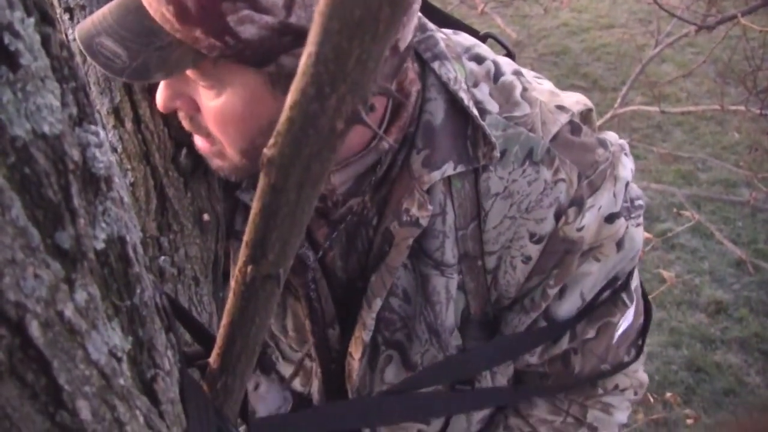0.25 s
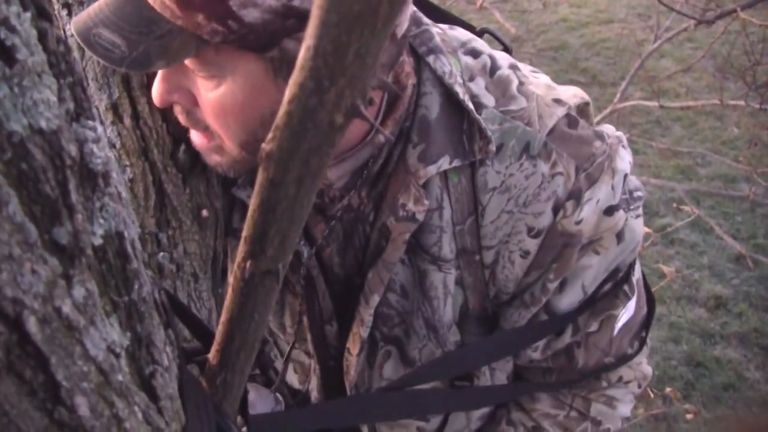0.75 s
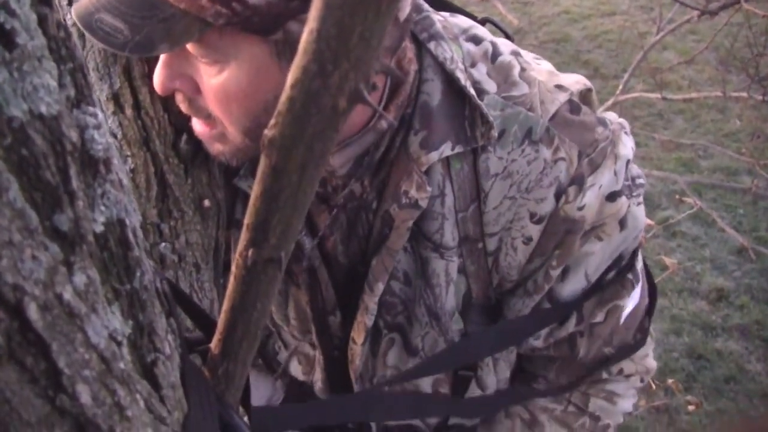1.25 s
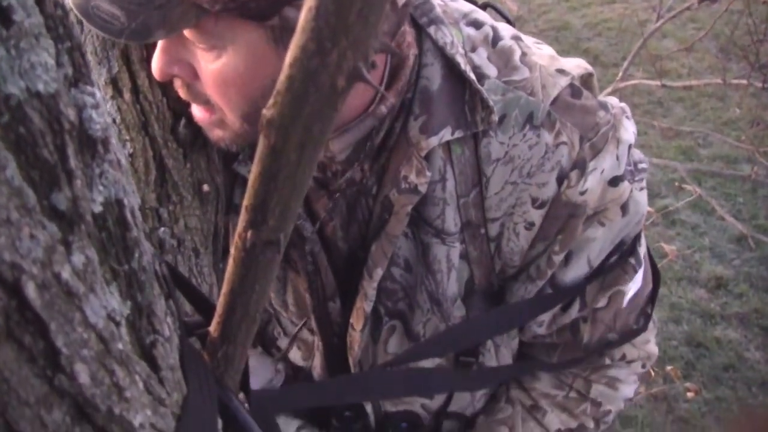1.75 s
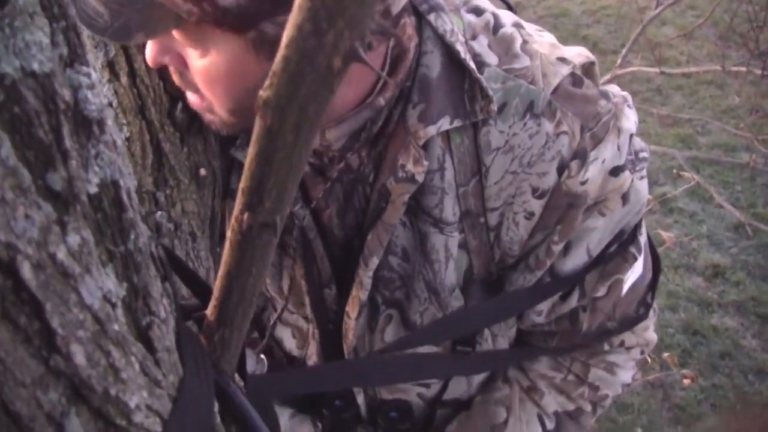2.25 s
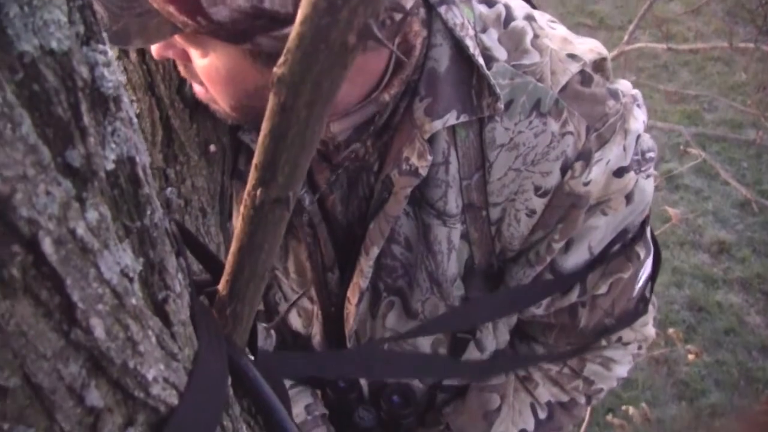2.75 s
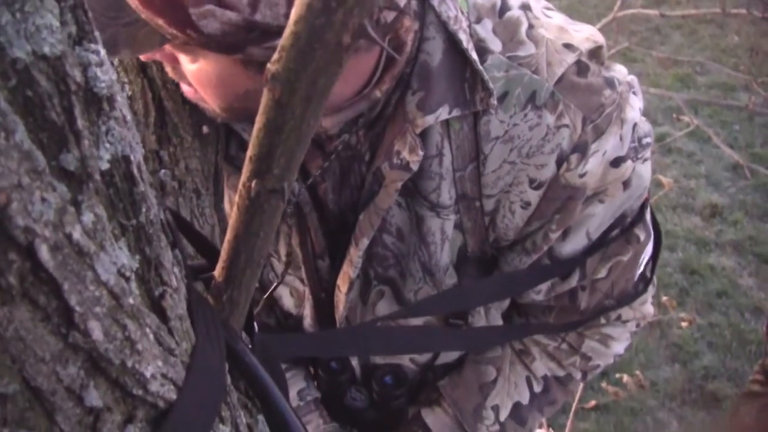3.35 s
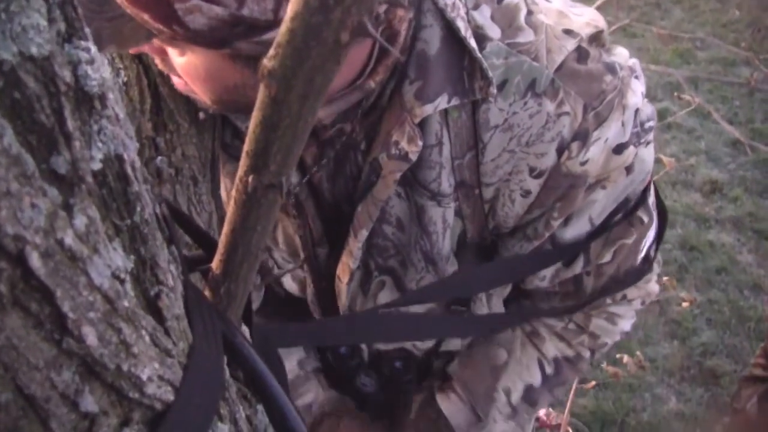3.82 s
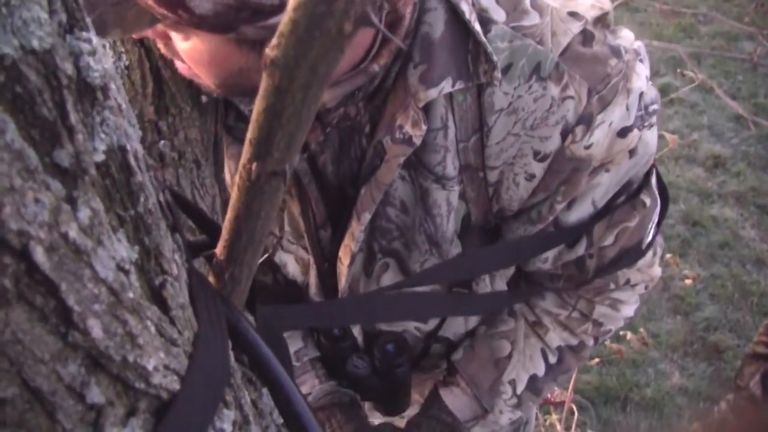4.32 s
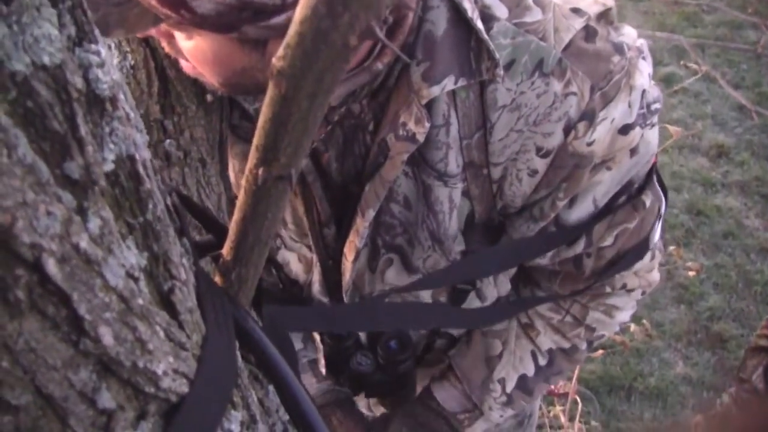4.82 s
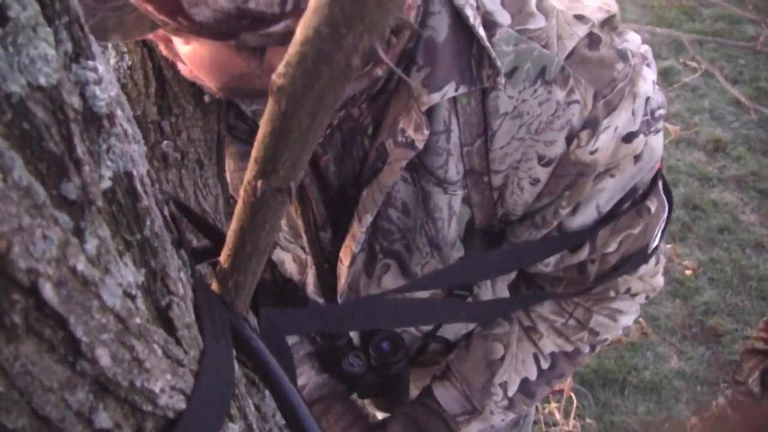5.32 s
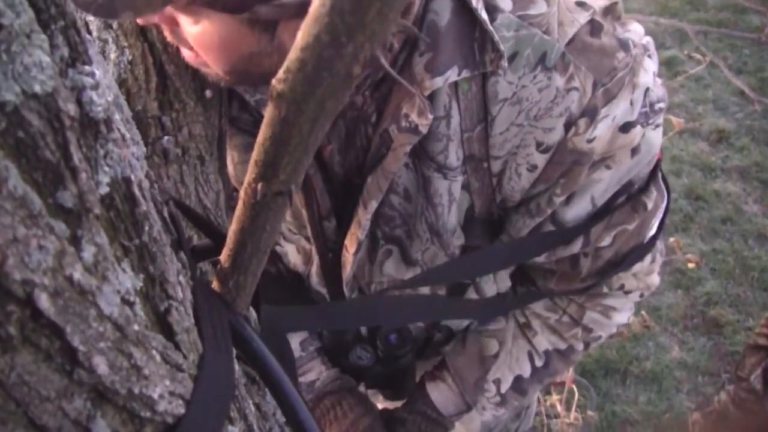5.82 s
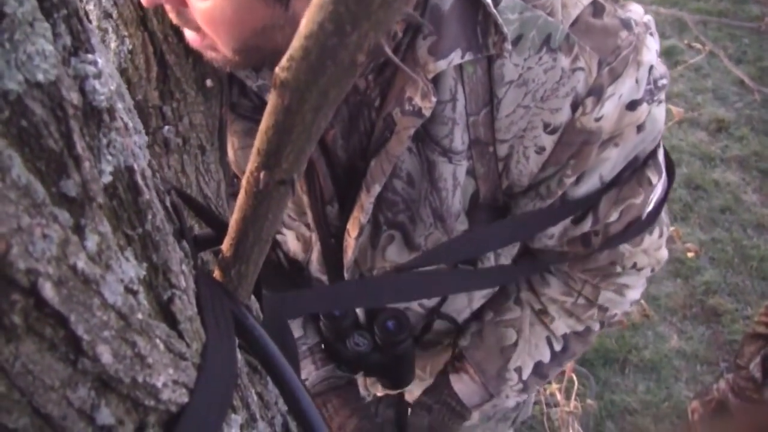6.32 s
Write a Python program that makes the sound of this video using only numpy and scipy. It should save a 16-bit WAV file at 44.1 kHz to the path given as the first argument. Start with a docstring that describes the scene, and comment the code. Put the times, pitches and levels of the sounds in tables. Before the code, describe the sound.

Close, dry rattling of two deer antlers, knocking and grinding together in quick uneven bursts, with a faint low outdoor hush in the gaps.

```python
"""In a quiet wood, a hunter in a tree stand rattles a pair of deer antlers close to the microphone.
Tines (the antler points) knock together and grind over knobbly bone: small contacts set off short
rings, mixed with crunchy noise. The hands damp most of the ringing within a few hundredths of a second.
Loose tine tips ring on faintly, trees return a soft echo, and filtered noise makes a low, distant hush
with a faint drone in it; the level of the hush dips and recovers."""
import sys
import numpy as np
from scipy import signal
from scipy.io import wavfile
from scipy.ndimage import uniform_filter1d, minimum_filter1d, map_coordinates

SR = 44100
rng = np.random.default_rng(int(sys.argv[2]) if len(sys.argv) > 2 else 0)


def transcribe(u):
    """Save the signal u as a 16-bit wav file named by the first command-line argument.

    u: samples, shape (n,) or (channels, n), limited to [-1, 1]; the rate is SR.
    q: integer samples, one column per channel.
    """
    v = np.clip(np.atleast_2d(u).T, -1, 1)
    q = np.round(v * 32767).astype(np.int16)
    wavfile.write(sys.argv[1], SR, q)


N = 289737

# The sound is built in four registers, low to high: hollow beam (main stem), main ring, tines, hard crack.

# Knocks of antler on antler, levels before the balance of the registers:
# t/s, level/dB, beam against that level/dB, crack against that level/dB, pitch of the struck spot f/Hz
KNOCK_LIST = [(0.2719, -19, -21, -15, 2560), (0.2868, -15.5, -8, -13, 2880),
              (0.3069, -14.5, -11, -12, 1950), (0.341, -30, -4, -22, 1860),
              (0.3565, -25.5, -8.5, -37, 2020), (0.7905, -58, 4, -5, 1150), (1.0227, -24.5, -7, -27, 1930),
              (1.0455, -16, -12.5, -17.5, 1930), (1.0783, -13, -17, -17.5, 2000),
              (1.092, -21, -25.5, -14, 1820), (1.1155, -22.5, -15, -22.5, 1940),
              (1.147, -14, -11.5, -4.5, 1910), (1.1634, -20, -7.5, -28.5, 3110),
              (1.1866, -6, -29, -14, 2200), (1.2622, -16, -24, -18, 2090),
              (1.2819, -15, -20.5, -14.5, 4040), (1.299, -10, -25.5, -11, 4330),
              (1.3353, -18, -14, -5.5, 1995), (1.394, -32, -1.5, -19.5, 1100),
              (1.434, -40.5, 6, -27.5, 920), (1.465, -16.5, -7, -9, 1870),
              (1.4916, -19.5, -16, -14.5, 1840), (1.5476, -1, -23.5, -16, 1960),
              (1.5547, -14.5, -11, -11, 3040), (1.5832, -23.5, -1.5, -23.5, 930),
              (1.599, -14, -8, -14, 1940), (1.7559, -39.5, -3, -41, 1020), (1.7793, -19, -10.5, -37, 3080),
              (1.8057, -25, -15.5, -29, 3280), (1.851, -23.5, -17, -14, 3720),
              (1.865, -14.5, -10.5, -16, 3360), (1.8813, -11.5, -13.5, -20, 2840),
              (1.955, -27, -19, -21, 4460), (1.9899, -14, -26.5, -12.5, 2039),
              (2.0344, -19.5, -20.5, -5.5, 4430), (2.0411, -16.5, -19, -7, 1890),
              (2.0466, -14, -7.5, -29, 1816), (2.0632, -32, -3, -19, 2970), (2.1183, -13.5, -10, -35, 2000),
              (2.1364, -12.5, -15.5, -14.5, 2130), (2.163, -29, -5.5, -28, 4340),
              (2.3068, -40.5, -8.5, -23, 1960), (2.3494, -12.5, -19, -14.5, 1820),
              (2.38, -13, -24, -4.5, 5480), (2.4168, -10, -25.5, -7, 4410),
              (2.4239, -15.5, -20.5, -6.5, 4160), (2.4525, -30.5, -15, -25, 2040),
              (2.469, -19, -28.5, -14.5, 3120), (2.502, -13, -20, -13, 2700),
              (2.529, -13.5, -15, -1.5, 2833), (2.5587, -17, -11.5, -9.5, 1950),
              (2.5734, -23.5, -14, -25.5, 3970), (2.6137, -24, -20.5, -16.5, 2000),
              (2.6661, -19, -5.5, -28, 1900), (2.7171, -15.5, 1, -36, 1108), (2.7227, -12.5, -4, -34, 1046),
              (2.867, -42.5, 1, -30.5, 1807), (3.2611, -48, -8.5, -39, 2010),
              (3.5768, -16.5, -18, -18.5, 3520), (3.6241, -18, -22, -21, 2020),
              (3.6829, -11.5, -16.5, -26, 2750), (3.6868, -4, -18, -20.5, 2800),
              (3.7282, -17, -26.5, -19.5, 3580), (3.8363, -17, -9.5, -12, 3320),
              (3.8544, -16, -29, -21.5, 3770), (3.8689, -17.5, -21, -13.5, 1820),
              (3.897, -8.5, -22.5, -11.5, 2126), (3.9258, -19.5, -23.5, -7.5, 3240),
              (3.9998, -47, -2, -15.5, 930), (4.1026, -44, -4, -28.5, 2038),
              (4.1293, -30.5, -10.5, -42.5, 1920), (4.1523, -26, -9.5, -16.5, 1950),
              (4.1727, -12.5, -17, -22.5, 2220), (4.1908, -3, -20, -19.5, 2860),
              (4.2121, -20, -12.5, -9, 2170), (4.287, -40, -19.5, -30.5, 1910),
              (4.3194, -36, -15.5, -20.5, 2130), (4.3375, -22, -16.5, -16, 3570),
              (4.4447, -15.5, -20.5, -33, 1850), (4.463, -12.5, -14, -8.5, 2950),
              (4.477, -11, -16, -25.5, 2000), (4.4854, -4.5, -36, -17, 2630),
              (4.7696, -42.5, -6.5, -35, 2060), (4.803, -20.5, -22.5, -26.5, 2060),
              (4.8091, -12.5, -23, -37.5, 2050), (4.8162, -11, -10.5, -22.5, 2700),
              (4.845, -19.5, -3, -23.5, 2130), (4.8592, -12.5, -25.5, -18, 2230),
              (4.8833, -33.5, -7, -15.5, 1670), (4.9001, -30, -9.5, -28.5, 2080),
              (4.9595, -46.5, -5, -34, 1884), (5.378, -21.5, -10.5, -18.5, 1913),
              (5.4, -13.5, -15, -10.5, 1940), (5.4168, -9.5, -27, -22, 2100),
              (5.4451, -20.5, -28.5, -11, 1710), (5.4727, -16, -29, -26.5, 2950),
              (5.4991, -14.5, -23.5, -24, 1867), (5.5647, -30.5, -13.5, -25.5, 2180),
              (5.624, -22.5, -23, -18.5, 3610), (5.6459, -25, -10.5, -13.5, 4290),
              (5.6628, -16, -29.5, -23.5, 2730), (5.673, -5.5, -24.5, -12, 2630),
              (5.6859, -10, -27, -12.5, 2770), (5.715, -18.5, -28, -14, 2103),
              (5.7722, -17.5, -24.5, -25, 1690), (6.4201, -46, -1, -33, 920), (6.512, -43, -23, -41, 2140)]
# Strokes in which the antlers slide on each other, before the overall grinding level:
# start t/s, swell/s, fade/s, peak level/dB, sharpness of the edges/dB
STROKE_LIST = [(0.274, 0.037, 0.013, -15, -14), (0.327, 0.02, 0.026, -27, -26),
               (1.03, 0.051, 0.048, -15.5, -5.5), (1.163, 0.022, 0.011, -12, -11),
               (1.253, 0.032, 0.062, -15, 4), (1.459, .043, 0.044, -15, -2),
               (1.541, 0.021, 0.0069, -16, -27), (1.581, 0.024, 0.0078, -12.5, -3),
               (1.785, .027, .012, -25, -12), (1.854, 0.033, 0.035, -11, -0.5),
               (1.972, 0.02, 0.028, -11, -12), (2.03, 0.011, 0.013, -15, -20),
               (2.062, .02, 0.028, -26.5, -25), (2.117, 0.012, 0.024, -14.5, -17),
               (2.328, 0.037, 0.074, -15, -5.5), (2.373, 0.045, 0.021, -20, -5),
               (2.472, .051, 0.047, -14, 3), (2.666, 0.00765, 0.029, -23, -18.5),
               (2.708, 0.016, .011, -19, -20), (3.629, 0.063, 0.053, -14.5, -6),
               (3.803, 0.1, .036, -14, -14), (4.135, 0.061, 0.028, -14, -9.5),
               (4.432, .054, .03, -12.5, -5), (4.505, 0.024, .012, -29.5, 5), (4.8, .016, .04, -12.5, -15),
               (5.381, 0.029, .026, -14.5, -2), (5.444, 0.015, 0.074, -22.5, -7),
               (5.646, 0.036, 0.044, -13.5, 1)]


def from_db(db):
    """Turn decibels into a multiplier for the wave."""
    return 10 ** (np.asarray(db) / 20)


def rms(x):
    """Root mean square: the average strength of a sound."""
    return np.sqrt(np.mean(x ** 2) + 1e-20)


def add(out, s, sound):
    """Mix a stereo sound in, starting at s seconds."""
    at = max(round(s * SR), 0)
    out[:, at:at + sound.shape[1]] += sound[:, :N - at]


def at_hz(points, hz, axis=1):
    """Read a table's column at a pitch, in straight lines on a log-frequency axis."""
    points = np.array(points)
    return np.interp(np.log(hz), np.log(points[:, 0]), points[:, axis])


def cut(x, hz, kind, order=2):
    """Keep only part of the pitch range, with a Butterworth filter."""
    return signal.sosfilt(signal.butter(order, hz, kind, fs=SR, output="sos"), x)


def drift(rate, size):
    """Wander around zero in straight lines between random points, rate points a second."""
    knots = np.arange(size) * rate / SR
    values = rng.standard_normal(int(knots[-1]) + 2)
    return np.interp(knots, np.arange(len(values)), values)


def noise_bands(size):
    """Split noise into half-octave bands, each with its centre in Hz and two unrelated noises."""
    edges = np.geomspace(25, 17000, 20)
    # neighbouring bands take turns between two sources
    white = rng.standard_normal((2, 2, size))
    bands = []
    for k, (low, high) in enumerate(zip(edges, edges[1:])):
        bands.append((np.sqrt(low * high), cut(white[k % 2], [low, high], "band")))
    return bands


def knocks(register_db, chatter_db, chatter_s, glancing_s, glancing_db, lone_damping,
           crunch_db=-4, crunch_t60=0.024):
    """A lone knock is a short clack with quick rebounds; between sliding antlers it becomes a skid."""
    favour_db = 6.5  # lift of the mode under the struck spot
    # tines ring more, against the main ring, the harder the crack and the higher the struck spot
    tine_db, tine_per_crack, tine_db_per_octave = 1.0, .45, 12.5
    usual_crack_db, usual_spot_hz = -20, 2500
    beam_top_hz = 1950  # every spot below this pitch wakes the tines alike

    out = np.zeros((2, N))
    size, attack = int(.06 * SR), int(.005 * SR)
    for s, db, beam_db, crack_db, spot_hz in KNOCK_LIST:
        sliding = any(start + .005 < s < start + swell + fade
                      for start, swell, fade, _, _ in STROKE_LIST)
        if sliding:
            spread, rebound_db, damping = glancing_s, glancing_db, 1
        else:
            spread, rebound_db, damping = chatter_s, chatter_db, lone_damping

        # one first contact and up to five rebounds
        clicks = np.zeros(size)
        delays = np.minimum(spread * (np.arange(5) + rng.random(5)) / 5, .02)
        clicks[(delays * SR).astype(int)] = from_db(rebound_db) * np.exp(-delays / spread)
        clicks[0] = 1
        registers = bone(clicks, spot_db=1.5, detune=0.038, damping=damping,
                         spot_hz=spot_hz, favour_db=favour_db)

        # main ring and tines share the energy of the blow
        octaves = np.log2(max(spot_hz, beam_top_hz) / usual_spot_hz)
        crack_lift_db = tine_per_crack * (crack_db - usual_crack_db)
        tine = from_db(tine_db + crack_lift_db + tine_db_per_octave * octaves)
        main = 1 / np.hypot(1, tine)
        balance = [from_db(beam_db), main, main * tine, from_db(crack_db)]
        levels = from_db(db + np.array(register_db)) * balance

        pressure = from_db(-60 * np.arange(size) / (crunch_t60 * SR))
        for level, ring, grit in zip(levels, registers, crunch(pressure)):
            # match strengths over the first 5 ms
            even_ring = ring / rms(ring[:, :attack])
            even_grit = grit / rms(grit[:, :attack])
            clack = even_ring + from_db(crunch_db) * even_grit
            add(out, s, level * clack / rms(clack[:, :attack]))
    return out


def grinding(level_db, catches_per_s, uneven_db, sharpness_slopes, crunch_db, crunch_t60):
    """Sliding tines catch on knobs of the beam in a dense, uneven run of contacts that swells and fades."""
    # balance of the beam (at the start), main ring, tines and crack: level/dB
    balance_db = [-10, 0.5, 0.5, -14.5]
    # every stroke starts and ends below its peak, and grows sharper as it runs out toward the tips
    start_db, end_db, sharpens_db = -15, -20, 5
    # soft run-in and run-out of each stroke: length, and faintest level against the peak
    run_s, run_db = .018, -45.5
    grips = 4  # the grip, and the modes with it, shift between these parts of a stroke
    beam_mutes_db_per_s = 1.6  # the grip tightens over the scene and mutes the hollow beam
    favour_db = 5.0  # lift of the mode at the spot of the knock nearest in time

    out, ring_out = np.zeros((2, N)), SR // 25
    for start, swell, fade, peak_db, edge_db in STROKE_LIST:
        length = swell + fade
        span = int((length + 2 * run_s) * SR)
        t = np.arange(span + ring_out) / SR - run_s
        force_db = np.interp(t, [-run_s, 0, swell, length, length + run_s],
                             [run_db, start_db, 0, end_db, run_db])
        force = from_db(peak_db + force_db)

        # catches come at uneven times with uneven strengths
        gaps = rng.gamma(2, .5, 400)
        at = (np.cumsum(gaps) * SR / catches_per_s).astype(int)
        sizes = from_db(uneven_db * np.clip(rng.standard_normal(len(at)), -2, 1.5))
        clicks = np.zeros(len(t))
        clicks[at[at < span]] = sizes[at < span]
        clicks *= force

        registers = np.zeros((4, 2, len(t)))
        shifts = np.linspace(0, span, grips + 1).astype(int)
        for a, b in zip(shifts, shifts[1:]):
            # keep the pitch of the spot last struck or about to be struck
            now = t[(a + b) // 2] + start
            spot_hz = min(KNOCK_LIST, key=lambda knock: abs(knock[0] - now))[-1]
            part = np.pad(clicks[a:b], (0, ring_out))
            registers[:, :, a:b + ring_out] += bone(part, spot_db=5.0, detune=.05, damping=0.56,
                                                    spot_hz=spot_hz, favour_db=favour_db)

        # every catch also crushes a little rough bone
        pressure = signal.lfilter([1], [1, -from_db(-60 / (crunch_t60 * SR))], clicks + 1e-18)
        energy = rms(force[:span]) * np.sqrt(span / len(t))
        # sharp edges bring out the upper registers
        sharpness = edge_db + sharpens_db * np.interp(t, [0, length], [-.5, .5])
        colours_db = np.array(balance_db, float)
        colours_db[0] -= beam_mutes_db_per_s * start
        for colour_db, slope, ring, grit in zip(colours_db, sharpness_slopes, registers, crunch(pressure)):
            scrape = ring / rms(ring) + from_db(crunch_db) * grit / rms(grit)
            gain = from_db(level_db + colour_db + slope * sharpness) * energy
            add(out, start - run_s, gain * scrape / rms(scrape))
    return out


def bone(clicks, spot_db, detune, damping, spot_hz=0, favour_db=0):
    """Contacts wake the antlers' modes (natural tones), some more than others; four stereo registers."""
    # modes of the two hand-held antlers, before detuning, damping and the ring limit:
    # f/Hz, relative level/dB, time to fall by 60 dB t60/s
    modes = [(330, -15, 0.048), (570, -13.5, 0.0055), (791, -10.5, 0.03), (946, -5.5, 0.05),
             (995, 0.5, 0.021), (1116, 4, 0.062), (1599, -11.5, 0.023), (1793, -9.5, 0.031),
             (1784, 0, 0.054), (1960, 5, 0.03), (2103, 1, 0.034), (2097, -1, 0.047), (2690, -4.5, 0.028),
             (2896, -5, 0.033), (3280, -5, 0.02), (3576, -5.5, 0.052), (3993, -10.5, 0.035),
             (4460, -3.5, 0.06), (4693, -4, 0.0057), (5317, -7, 0.013), (5983, 4.5, 0.025),
             (6490, 2, 0.011), (8100, 3.5, 0.019), (8610, -6.5, 0.05), (9280, -9, 0.0099),
             (10600, -10, 0.013), (10660, -9, 0.027), (12700, -20.5, .007)]
    # borders between the four registers: f/Hz
    register_edges = [1400, 2450, 5800]
    # how much more of each register the left side gets: level/dB
    left_db = [1.6, .9, -1.2, .8]
    longest_ring_s = .024  # limit on t60 in the gripping hands
    turn_db, turn_lag_ms = 0.56, 0.0078  # random left-right spread: lean at 1 kHz, and lag

    registers, at = np.zeros((4, 2, len(clicks))), np.flatnonzero(clicks)
    struck = np.argmin(np.abs(np.array(modes)[:, 0] - spot_hz))
    for k, (hz, db, t60) in enumerate(modes):
        register = np.searchsorted(register_edges, hz)
        # grip and pressure shift the modes a little
        hz = hz * (1 + detune * rng.standard_normal())
        if spot_hz and k == struck:
            hz, db = spot_hz, db + favour_db

        # every contact pushes this mode by its own amount, one way or the other
        push = np.zeros(len(clicks)) + 1e-18
        strength = from_db(db + spot_db * rng.standard_normal(len(at)))
        push[at] = clicks[at] * strength * rng.choice([-1, 1], len(at))
        w = 2 * np.pi * hz / SR
        ring_s = min(t60 / damping, longest_ring_s)
        r = np.exp(-np.log(1000) / (ring_s * SR))

        # a slender tine gives off almost nothing below its own note
        leak = np.exp(-w / 2)
        push = signal.lfilter(np.array([1, -1]) * (1 + leak) / 2, [1, -leak], push)

        # the antlers turn in the hands: each mode leans and lags between the sides, high ones most
        lean_db = left_db[register] + turn_db * np.sqrt(hz / 1000) * rng.standard_normal()
        lag = w * turn_lag_ms * SR / 1000 * rng.standard_normal()
        for side, sign in enumerate([.5, -.5]):
            start_phase = [np.sin(sign * lag), r * np.sin(w - sign * lag)]
            ring = signal.lfilter(start_phase, [1, -2 * r * np.cos(w), r * r], push + 1e-18)
            registers[register, side] += from_db(sign * lean_db) * ring
    return registers


def crunch(pressure):
    """Rough bone crushes at the contact: stereo noise in each register that follows the pressure."""
    # band of the dry crunch, one row a register: low edge f/Hz, high edge f/Hz
    bands = [(750, 1100), (1500, 2610), (2600, 3660), (5800, 10000)]
    # scattering off the antlers makes high bands differ more between left and right:
    # side (difference) against middle (shared) in each register, level/dB
    sides_db = [-17.5, -17, -9, -0.5]
    mids, sides = rng.standard_normal((2, 4, len(pressure))) * pressure + 1e-18
    grits = []
    for mid, side, side_db, band in zip(mids, sides, sides_db, bands):
        stereo = mid + from_db(side_db) * side * [[1], [-1]]
        grits.append(cut(stereo, band, "band"))
    return grits


def free_tips(x):
    """Blows leave the loose tine tips ringing faintly, each as a narrow cluster of close tones."""
    # tips left free by the hands: f/Hz, level/dB, time to fall by 60 dB t60/s
    tips = [(2700, -48.5, .4), (3160, -48, 0.8), (4500, -48, 0.58), (6100, -36, .45), (8400, -46, .35)]
    width_hz = 420
    t = np.arange(int(.6 * SR)) / SR
    response = 0
    for hz, db, t60 in tips:
        noise = rng.standard_normal((2, len(t)))
        cluster = cut(noise, [hz - width_hz / 2, hz + width_hz / 2], "band")
        ring = cluster * from_db(-60 * t / t60)
        response = response + from_db(db) * ring / np.linalg.norm(ring)
    return signal.fftconvolve(x, response, axes=1)[:, :N]


def woodland(x, near_db, near_t60):
    """Trunk and stand scatter the sound at once; farther trees return a faint tail of fading noise."""
    # dying of the far echo: f/Hz, level/dB, time to fall by 60 dB t60/s
    far_echo = [(252.6, -36.5, .7), (1000, -27.5, 0.58), (2000, -35.5, 0.89), (4000, -36, .55),
                (8000, -35, .4), (14000, -45.5, .3)]
    t = np.arange(int(.8 * SR)) / SR
    response = 0
    for hz, pair in noise_bands(len(t)):
        # the far echo builds up softly before it dies away
        far = from_db(-60 * t / at_hz(far_echo, hz, axis=2)) * (1 - np.exp(-t / .015))
        near = from_db(-60 * t / near_t60) * (t > .001)
        far_part = from_db(at_hz(far_echo, hz)) * far / np.linalg.norm(far)
        near_part = from_db(near_db) * near / np.linalg.norm(near)
        response = response + pair * (far_part + near_part)
    return signal.fftconvolve(x, response, axes=1)[:, :N]


def hush(level_db, flicker_db, treble_follow):
    """Distant air and leaves as noise, with a faint wavering drone; treble follows level changes less."""
    # level of the hush as it dips and recovers, before the lift level_db and the flicker: t/s, level/dB
    level_points = [(0, -63.5), (.38, -59), (0.631, -55), (0.999, -54.5), (1.661, -64.5), (1.779, -61),
                    (2.25, -57), (2.78, -57.5), (2.979, -52.5), (3.55, -54.5), (3.971, -61), (4.08, -55.5),
                    (4.57, -63), (4.66, -56.5), (5.351, -54.5), (5.82, -60.5), (5.88, -58.5), (6.57, -55)]
    # colour of the noise before its overall level is set: f/Hz, relative level per Hz/dB
    colour = [(25, -29), (55, -26.5), (90, -8), (130, -8), (260, 2), (450, -5.5), (750, -1), (1200, -10.5),
              (1900, -15), (2600, -21), (4200, -24.5), (7000, -33), (12000, -36), (16000, -48)]
    # how alike left and right are: f/Hz, likeness from 0 to 1
    likeness = [(60, 0.4), (150, 1), (300, 0.68), (800, 0.4), (2500, 0.5), (8000, 0)]
    # far drone, before its wavering and the dips in level: f/Hz, level/dB
    drone_tones = [(128, -66), (225, -68)]

    course_db = np.interp(np.arange(N) / SR, *np.transpose(level_points))
    usual_db, air = course_db.mean(), 0
    for hz, (mid, side) in noise_bands(N):
        alike = np.clip(at_hz(likeness, hz), 0, 1)
        follow = 1 if hz < 2000 else treble_follow
        change_db = course_db - usual_db + flicker_db * drift(7.0, N)
        gain = from_db(at_hz(colour, hz) + follow * change_db)
        air = air + gain * (np.sqrt(1 + alike) * mid + np.sqrt(1 - alike) * side * [[1], [-1]])

    drone = 0
    for hz, db in drone_tones:
        loudness = from_db(db + course_db - usual_db + 1.6 * drift(4.8, N))
        pitch_hz = hz + 4 * drift(16, N)
        drone = drone + loudness * np.sin(2 * np.pi * np.cumsum(pitch_hz) / SR)
    return from_db(usual_db + level_db) * air / rms(air) + drone


def scene():
    """Mix the antlers, a little to the left so that side hears them first, with the wood around them."""
    left_lead_ms = 0.03
    antlers = knocks(register_db=[-3.0, -1.0, -0.5, -3.5], chatter_db=3.0, chatter_s=0.0017,
                     glancing_s=.004, glancing_db=5.5, lone_damping=0.37)
    antlers += grinding(level_db=-3.5, catches_per_s=500, uneven_db=5.5,
                        sharpness_slopes=[0.067, 0.02, 0.59, 1.0], crunch_db=-7, crunch_t60=0.025)
    antlers = cut(antlers, 14500, "low", order=4)
    antlers = cut(antlers, 280, "high", order=1)
    # delay the right side by little more than one sample
    late = np.arange(N) - left_lead_ms * SR / 1000
    antlers[1] = map_coordinates(antlers[1], [late], order=3)

    tips = free_tips(antlers)
    echo = woodland(antlers, near_db=-24.5, near_t60=0.048)
    return antlers + tips + echo + hush(level_db=6.0, flicker_db=3.26, treble_follow=0.56)


def record(dry):
    """A fast limiter holds the loudest peaks down, the wave bends slightly, and the top is cut."""
    ceiling, window = .95, int(.002 * SR)
    lopsided = .012  # share of uneven bend under load: gives the hardest blows a faint thump
    cutoff_hz = 16900  # the filter is 70 dB down from here up
    gain = np.minimum(1, ceiling / (np.abs(dry).max(axis=0) + 1e-9))
    gain = uniform_filter1d(minimum_filter1d(gain, window), window)
    held = dry * gain
    held = held + lopsided * held ** 2
    return signal.sosfilt(signal.cheby2(14, 70, cutoff_hz, fs=SR, output="sos"), held)


dry = scene()
out = record(dry)
transcribe(out)
```